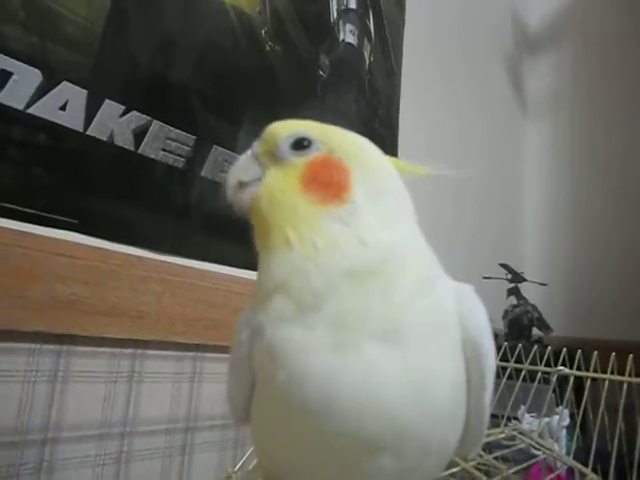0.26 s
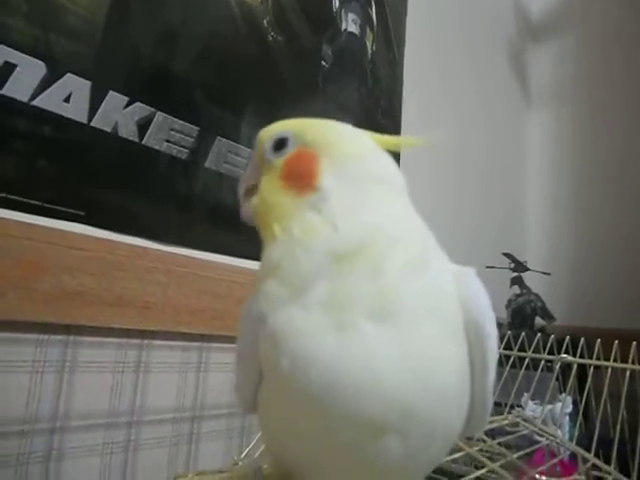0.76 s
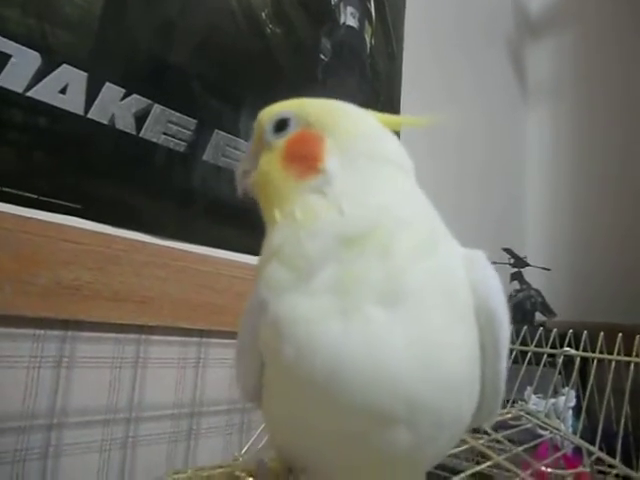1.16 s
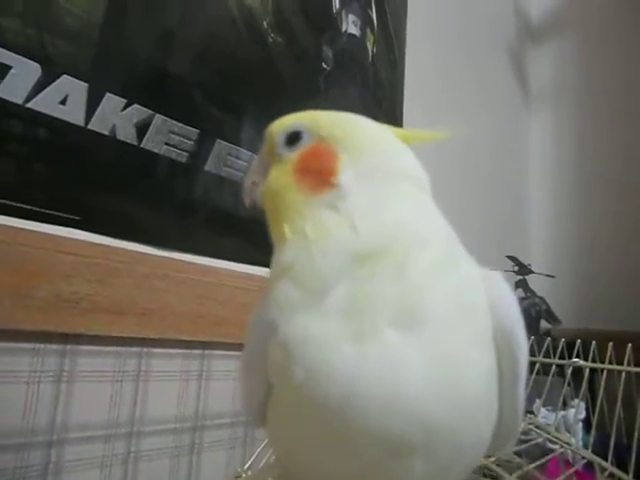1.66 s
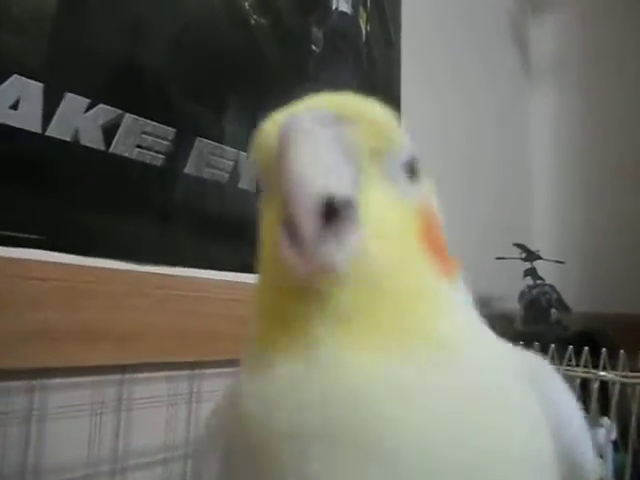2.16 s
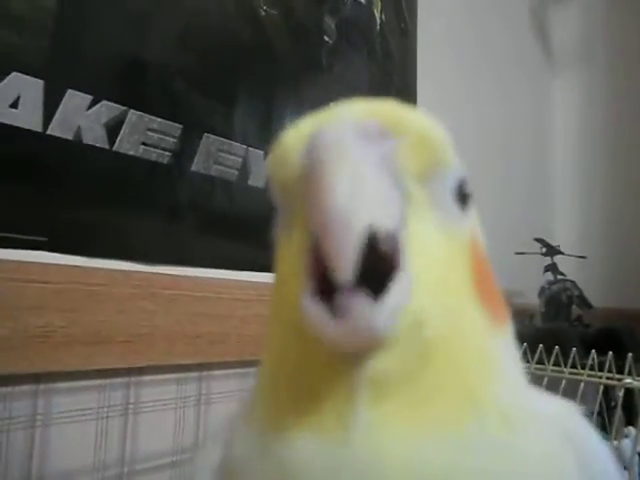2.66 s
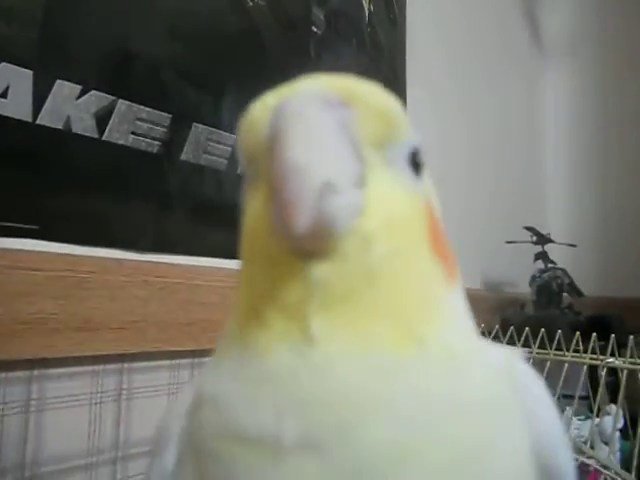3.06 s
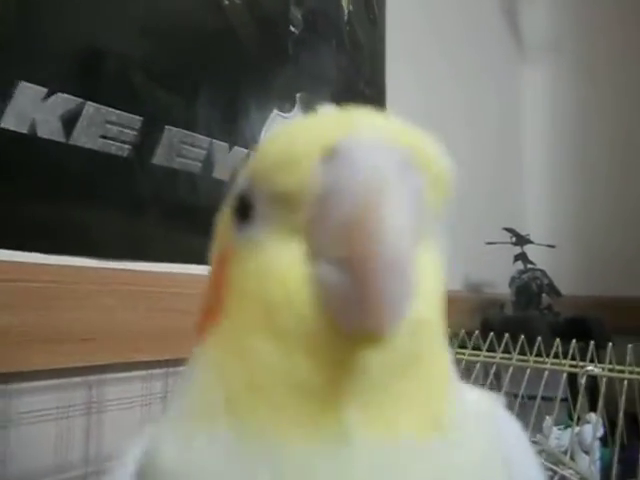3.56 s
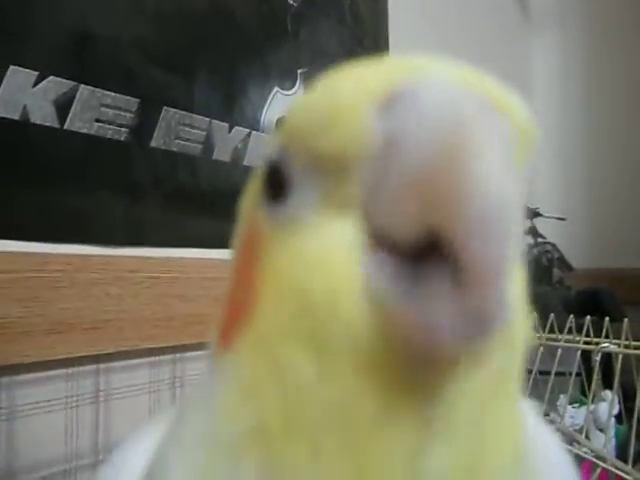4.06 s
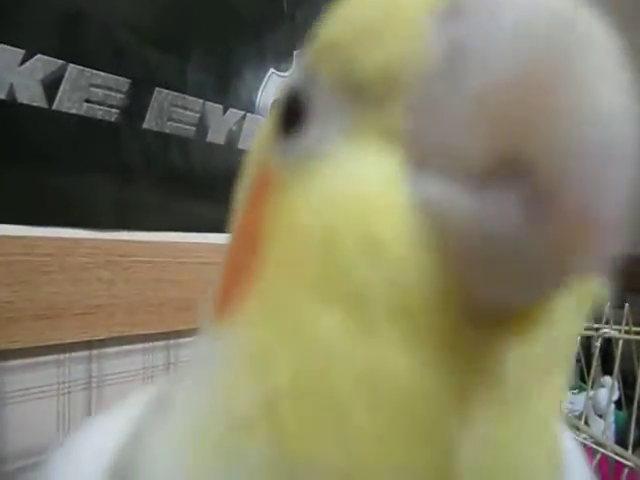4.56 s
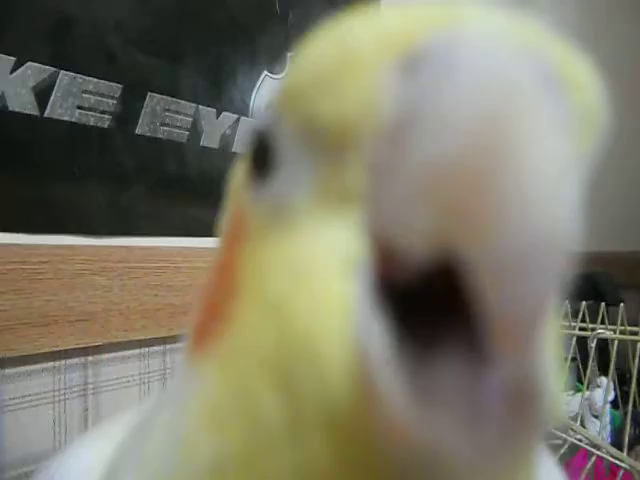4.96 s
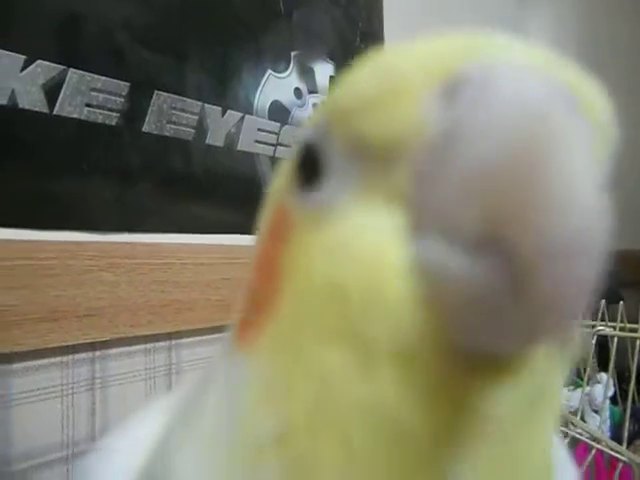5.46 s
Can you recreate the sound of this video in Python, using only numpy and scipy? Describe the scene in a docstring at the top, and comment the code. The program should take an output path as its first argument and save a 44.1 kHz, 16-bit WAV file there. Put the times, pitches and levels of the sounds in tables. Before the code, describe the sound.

A cockatiel croaks close to the microphone in a small room. From the start until about 2.7 seconds it gives twelve short calls, four or five a second. Each lasts just over a tenth of a second, dropping from a clear squeak into a rough rattle and often ending in a thin, falling whistle. The calls grow louder and drier as the bird comes closer, strongest around 2 seconds, with one soft, dull bump near 1.9. The bird then pauses, and a few small dry ticks sound, the clearest at about 3.8 seconds. From 4 seconds to about 5.6 comes a second bout of eight close croaks at the same pace, with a loud, bright squeak near 4.7 and a few faint ticks between calls. A faint electrical hum and hiss run underneath throughout, swelling and sinking slightly.

```python
"""A cockatiel croaks twenty short calls in two bouts, close by in a small room that hums.
Source and filter: the syrinx emits a pulse train that drops from a clear squeak into a rattle and
often ends in a thin whistle. The pulses excite the fixed resonances of the windpipe and a beak
resonance that sweeps up and down as the beak opens and shuts. A few dry ticks, one soft bump and
brief reflections join the calls, over mains hum and hiss."""
import sys
import numpy as np
from scipy import signal
from scipy.io import wavfile
from scipy.ndimage import minimum_filter1d

SR = 44100
rng = np.random.default_rng(int(sys.argv[2]) if len(sys.argv) > 2 else 0)


def output_pcm(signal):
    """Save a mono or channel-first signal as 16-bit PCM at the path in sys.argv[1].

    Samples are clipped to [-1, 1] before scaling.
    """
    pcm = np.clip(np.atleast_2d(signal).T, -1, 1) * 32767
    wavfile.write(sys.argv[1], SR, np.round(pcm).astype(np.int16))


N = 252252


def croak(length_s, opening_s, shutting_s, attack_s, level_db, accent_db, accent_s, pipe_db,
          squeak_hz, squeak_s, rattle_hz, roughness):
    """Formant sweep: the gape tunes the beak resonance while a clear squeak drops into a rattle."""
    t = np.arange(0, length_s, 1 / SR)
    left_s = np.maximum(length_s - t, 0)
    # the beak opens quickly, eases through the last of its gape, then shuts
    easing = 1 - .24 * np.exp(-t / (2.02 * opening_s))
    opened = (1 - np.exp(-(t / opening_s) ** 2)) * easing
    shut = 1 / (1 + (left_s / shutting_s) ** 2.385)
    gape = opened * (1 - shut)
    shut_hz, open_hz, shut_db = 1160, 4101, -25
    beak_hz = shut_hz + (open_hz - shut_hz) * gape
    # the squeak sags, then drops into a rougher rattle that sags more slowly
    squeak_sag_hz_per_s, drop_s, rattle_sag_hz_per_s = 9000, .011, 500
    squeak = np.exp(-np.maximum(t - squeak_s, 0) / drop_s)
    pitch_hz = squeak * (squeak_hz - squeak_sag_hz_per_s * np.minimum(t, squeak_s))
    pitch_hz += (1 - squeak) * (rattle_hz - rattle_sag_hz_per_s * (t - length_s / 2))
    roughness = roughness * (1 - .67 * squeak) * (1 - shut) + .97 * shut
    # effort: a swell, an early accent and a last push as the beak starts to shut
    push_lead_s, push_width_s, release_s = .012, .0077, .013
    swell_db = -18.5 * np.maximum(1 - t / attack_s, 0)
    accent = 1 / (1 + (t / accent_s) ** 4)
    push_db = 3 * np.exp(-((left_s - shutting_s - push_lead_s) / push_width_s) ** 2)
    flutter_db = 1.88 * drift(t, per_s=170)
    beak_db = level_db + swell_db + accent_db * accent + push_db + shut_db * (1 - gape)
    # a hard onset leaks briefly through the windpipe, which is also heard more as the beak shuts
    leak_above_db, leak_s = -15, .031
    leak_db = 2.1 * max(level_db + accent_db - leak_above_db, 0) * np.exp(-t / leak_s)
    pipe_db = pipe_db + .29 * swell_db + leak_db + 6 * shut
    sound = vocal_tract(t, pitch_hz, roughness, beak_hz, beak_db + flutter_db, pipe_db + flutter_db)
    return sound * np.sqrt(np.minimum(left_s / release_s, 1))


def whistle(length_s, beak_db, pipe_db, first_hz, last_hz, beak_hz, roughness=.22):
    """Register change: the syrinx flips to a thin, fading note; pitch and resonance glide together."""
    t = np.arange(0, length_s, 1 / SR)
    glide = (last_hz / first_hz) ** (t / length_s)
    fade_db = -5.5 * t / length_s
    return vocal_tract(t, first_hz * glide, roughness, beak_hz * glide,
                       beak_db + fade_db, pipe_db + fade_db)


def syrinx(t, pitch_hz, roughness, wander=.14, jitter=.085, shimmer=.5, doubling=.3):
    """Pulse source: one pulse a cycle; roughness adds jitter, shimmer, period doubling and noise."""
    cycles = np.cumsum(pitch_hz * np.exp(wander * roughness * drift(t, per_s=260))) / SR
    at = np.flatnonzero(np.diff(np.floor(cycles)) > 0)
    timing, strength = rng.standard_normal((512, 2))[:len(at)].T
    delay_cycles = np.ceil(cycles[at]) - cycles[at] + jitter * roughness[at] * timing
    centre = at + delay_cycles * SR / pitch_hz[at]
    alternation = (-1) ** np.arange(len(at))
    size = np.exp(np.sqrt(roughness[at]) * shimmer * strength + roughness[at] * doubling * alternation)
    # a windowed sinc places each pulse between samples
    near = np.floor(centre).astype(int)[:, None] + np.arange(-8, 9)
    offset = near - centre[:, None]
    shape = np.sinc(offset) * np.cos(np.pi * offset / 18) ** 2
    pulses = np.zeros(len(t))
    np.add.at(pulses, np.clip(near, 0, len(t) - 1), size[:, None] * shape)
    noise = rng.standard_normal(SR // 4)[:len(t)]
    return unit_rms(pulses) + .2 * np.sqrt(roughness) * noise


def vocal_tract(t, pitch_hz, roughness, beak_hz, beak_db, pipe_db):
    """Source-filter model: syrinx pulses ring the fixed windpipe and two moving beak resonances."""
    # response of the windpipe: frequency_hz, gain_db
    windpipe = [(220, -42), (460, -11), (760, -9), (1400, 0), (1900, -3), (2800, -6), (4200, -11),
                (5400, -27), (8000, -38), (10000, -57), (12000, -75)]
    # muffling of the windpipe by a shut beak: frequency_hz, gain_db
    muffle = [(1600, 9), (2400, -9.5), (4000, -7), (7000, -33.5)]
    # radiation from the beak: frequency_hz, gain_db
    beak_outlet = [(200, -6.5), (700, 15), (1200, 17), (4400, 6), (5300, -1), (6500, 2), (8000, -35.5),
                   (9500, -32), (12000, -76)]
    # bright edge that escapes from a wide open beak: frequency_hz, gain_db
    edge_outlet = [(2500, -28), (5000, -22.5), (6000, -2), (8100, 13), (9300, -10.5), (10500, -17),
                   (12000, -27)]
    strain = np.interp(beak_db, [-20, -11], [.03, .24])  # pushed hard, even a squeak gets gritty
    pulses = syrinx(t, pitch_hz, np.clip(roughness, strain, 1))
    beak = coloured(resonance(pulses, beak_hz, width_hz=680), beak_outlet)
    opening = np.interp(beak_hz, [1500, 2800], [0, 1])
    pipe = coloured(pulses, windpipe)
    pipe = opening * pipe + (1 - opening) * coloured(pipe, muffle)
    # the weak upper resonance grows with strain and fades as the beak shuts
    edge = coloured(resonance(pulses, 1.83 * beak_hz, width_hz=1150), edge_outlet)
    edge_gain = gain_of(beak_db - 31 + 12 * strain) * (beak_hz / 4000) ** 4
    sound = gain_of(beak_db) * levelled(beak) + gain_of(pipe_db) * levelled(pipe)
    sound += edge_gain * levelled(edge)
    return sound * np.clip(t / .002, 0, 1) * np.clip((t[-1] - t) / .005, 0, 1)


def tick(peak_db, ring_hz, crack_s=.00037, ring_s=.001):
    """Impulsive transient: a tiny crack of noise with a heavily damped ring."""
    t = np.arange(SR // 50) / SR
    crack = rng.standard_normal(len(t)) * np.exp(-t / crack_s)
    ring = .15 * np.sin(2 * np.pi * ring_hz * t) * np.exp(-t / ring_s)
    sound = signal.sosfilt(signal.butter(14, 10000, fs=SR, output="sos"), crack + ring)
    return gain_of(peak_db) * sound / abs(sound).max()


def bump(pitch_hz=105, rise_s=.003, decay_s=.013):
    """Damped oscillation: a dull push rings for a few cycles."""
    t = np.arange(SR // 5) / SR
    envelope = (1 - np.exp(-t / rise_s)) * np.exp(-t / decay_s)
    return gain_of(-35) * envelope * np.sin(2 * np.pi * pitch_hz * t)


def room(x, t60_s=.27, first_s=.004, reflections_per_s=2500):
    """Reverberation: sparse reflections of random sign decay exponentially."""
    t = np.arange(SR // 2) / SR
    response = rng.standard_normal(len(t)) * gain_of(-60 * t / t60_s)
    response *= (rng.random(len(t)) < reflections_per_s / SR) & (t > first_s)
    return signal.fftconvolve(x, response / np.linalg.norm(response))[:N]


def background(mains_hz=60):
    """Line spectrum over broadband noise: mains harmonics and room hiss swell and sink together."""
    # partials of the hum: harmonic_number, relative_level_db
    harmonics = [(1, -8.5), (2, -10.5), (3, 0.5), (4, -14.5), (5, -18.5), (6, -13), (7, -18), (9, -13.5),
                 (10, -12.5), (11, -11.5), (13, -8), (14, -18), (15, -8)]
    # spectrum of the hiss: frequency_hz, relative_density_db
    hiss_spectrum = [(18, -6), (50, -1.5), (150, 0), (300, -4.5), (500, -2), (850, 1.5), (1300, -1.5),
                     (2200, -8), (4000, -11), (7000, -11.5), (10400, -14), (11200, -34), (12000, -29.5),
                     (12700, -77.5)]
    # envelope of both: time_s, level_db
    swell = [(0.0, -51.5), (0.27, -52), (0.43, -48), (0.92, -43), (1.21, -44), (1.31, -46), (2.37, -48),
             (2.44, -52.5), (2.69, -57), (3.28, -58.5), (3.43, -51.5), (3.94, -44), (4.03, -55.5),
             (5.29, -57.5), (5.56, -54.5)]
    t = np.arange(N) / SR
    hum = np.zeros(N)
    for number, level_db in harmonics:
        amplitude = gain_of(level_db) * np.sqrt(2) * (1 + .06 * drift(t, per_s=.93))
        hum += amplitude * np.sin(2 * np.pi * (number * mains_hz * t + rng.random()))
    hiss = unit_rms(coloured(rng.standard_normal(N), hiss_spectrum))
    return gain_of(np.interp(t, *np.transpose(swell))) * (hum + hiss)


def resonance(x, centre_hz, width_hz):
    """Two identical resonators in cascade, each width_hz wide, follow a moving centre frequency."""
    carrier = np.exp(2j * np.pi * np.cumsum(centre_hz) / SR)
    pole = np.exp(-np.pi * width_hz / SR)
    for _ in range(2):
        x = 2 * (carrier * signal.lfilter([1 - pole], [1, -pole], x / carrier + 1e-18)).real
    return x


def coloured(x, spectrum):
    """Minimum-phase filter through points of frequency_hz, gain_db."""
    hz, db = np.transpose(spectrum)
    bin_hz = abs(np.fft.fftfreq(4096, 1 / SR))
    log_gain = np.log(gain_of(np.interp(np.log(bin_hz + 1), np.log(hz), db)))
    taps = np.fft.ifft(np.exp(np.conj(signal.hilbert(log_gain)))).real
    return signal.fftconvolve(x, taps)[:len(x)]


def levelled(x, span_s=.012):
    """Short-time normalisation: holds the rms at 1 while single pulses keep their shape."""
    window = signal.windows.hann(int(span_s * SR))
    power = abs(signal.fftconvolve(x ** 2, window / window.sum(), "same"))
    return x / np.sqrt(power + 1e-14)


def unit_rms(x):
    """Normalisation to a mean power of 1."""
    return x / np.sqrt(np.mean(x ** 2) + 1e-20)


def drift(t, per_s):
    """Random modulation: Gaussian values joined by straight lines."""
    return np.interp((t - t[0]) * per_s, np.arange(256), rng.standard_normal(256))


def gain_of(db):
    """Amplitude ratio of a level in decibels."""
    return 10 ** (np.asarray(db) / 20)


def add(mix, start_s, sound):
    """Superposition: sums a sound into the mix from start_s on."""
    part = mix[round(start_s * SR):][:len(sound)]
    part += sound[:len(part)]


def scene(far_room_db=-21, near_room_db=-29, bump_s=1.897):
    """Direct and reverberant sound: the bird steps closer in the first bout, so the room answers less."""
    # calls: start_s, length_s, opening_s, shutting_s, attack_s, level_db, accent_db, accent_s,
    # pipe_db, squeak_hz, squeak_s, rattle_hz, roughness (0 to 1)
    croaks = [ (0.021, 0.1085, 0.0093, 0.021, 0.026, -26.5, 3, .062, -39, 1447, 0.0015, 753, 0.64),
              (0.233, 0.13, 0.018, 0.02, 0.0089, -30, 6.5, .055, -38.5, 1449, 0.0034, 789, 0.61),
              (0.457, 0.12, 0.011, 0.021, 0.0091, -23.5, -3.5, 0.032, -37.5, 1050, 0.0058, 764, 0.57),
              (0.659, .130, 0.012, 0.021, 0.021, -23, -0.5, 0.045, -34.5, 1340, 0.0021, 774.6, 0.7),
              (0.918, 0.1016, 0.0018, 0.017, 0.027, -28, 16.5, 0.054, -35, 900, 0.0019, 798.6, 0.79),
              (1.213, .130, 0.0023, 0.016, 0.032, -27.5, 17, 0.063, -34.5, 914, 0.00083, 774, 0.74),
              (1.444, 0.13, 0.0037, 0.019, 0.017, -23, 12, .024, -36.5, 912, 0.00097, 792, 0.78),
              (1.643, 0.15, 0.014, 0.02, 0.01, -19.5, -0.5, .040, -34, 1309, 0.0056, 773.6, 0.81),
              (1.865, .150, 0.012, .016, 0.024, -15, 2, 0.095, -31.5, 1334, 0.0041, 760, 0.73),
              (2.121, 0.13, 0.0069, 0.02, 0.022, -14, 2, 0.018, -33, 1273, 0.00088, 709.4, 0.8),
              (2.372, 0.1312, 0.0022, .022, 0.0038, -20.5, 11.5, 0.04, -35.5, 1447, .022, 765, 0.7),
              (2.607, 0.12, 0.0027, 0.02, .006, -22.5, 11.5, 0.046, -42, 1576, 0.022, 723, 0.1),
              (3.959, 0.12, 0.0012, .020, 0.0028, -17.5, 11.5, 0.022, -37.5, 1498, 0.0036, 795, .33),
              (4.177, 0.116, 0.0018, 0.021, 0.0025, -19, 7.5, 0.029, -38, 1610, .007, 721, .36),
              (4.421, 0.12, 0.0033, 0.022, 0.022, -21.5, 9, 0.015, -37.5, 1430, 0.0049, 764, 0.64),
              (4.687, 0.1, 0.0011, 0.021, .001, -19.5, 6.5, 0.023, -39, 1402, 0.0079, 794, 0.2),
              (4.858, 0.13, 0.017, .018, 0.026, -24.5, 6.5, 0.052, -37, 1411, .006, 714, 1),
              (5.07, 0.13, 0.013, 0.02, 0.019, -24, 6.5, 0.03, -39.5, 1380, 0.0014, 714, 0.81),
              (5.278, 0.14, 0.019, 0.014, 0.028, -21, -5, 0.014, -36.5, 1380, .009, 709, .8),
              (5.499, 0.14, 0.025, 0.018, 0.039, -21.5, 9.5, 0.046, -36, 1458, 0.0026, 679, 0.49), ]
    # notes in the clear register: start_s, length_s, beak_db, pipe_db, first_hz, last_hz, beak_hz
    whistles = [ (0.118, 0.041, -54, -34.5, 1870, 1080, 1700), (0.36, 0.03, -36, -37, 1550, 1115, 1590),
                (0.548, 0.01, -24, -36, 1250, 1100, 2300), (0.563, 0.017, -39, -31.5, 1780, 1570, 1560),
                (0.795, 0.033, -40.5, -40, 1247, 1130, 1250), (1.004, 0.019, -25, -33, 1083, 1110, 1620),
                (1.54, 0.02, -25, -29, 1258, 1160, 2450), (1.759, 0.027, -31, -28, 1090, 1160, 2100),
                (1.792, 0.045, -35.5, -33.5, 1237, 1110, 1250), (1.987, 0.022, -34, -23, 1145, 1178, 2380),
                (2.011, 0.01, -32.5, -30.5, 1360, 1100, 1400), (2.227, 0.012, -28.5, -23, 956, 947, 1920),
                (2.498, 0.0082, -32, -40, 1330, 1170, 1310), (2.723, 0.01, -38, -42.5, 1454, 1300, 1300),
                (4.058, 0.015, -41, -36, 1404, 1280, 1250), (4.284, .015, -37.5, -30, 1356, 1200, 1310),
                (4.531, 0.0095, -38, -30.5, 1430, 1230, 1386), (4.671, 0.019, -21.5, -43, 3230, 3145, 3160),
                (4.678, 0.024, -10.5, -42, 1992, 2280, 3580), (4.762, 0.019, -35, -34, 1106, 1110, 1200),
                (4.779, 0.018, -32.5, -42, 1580, 1050, 1500), (4.98, 0.031, -39, -35, 1630, 1110, 1640),
                (5.179, 0.036, -32.5, -55, 1460, 1078, 1500), (5.402, 0.029, -36, -33.5, 1560, 1133, 1570),
                (5.630, 0.025, -34, -39, 1685, 1150, 1660), ]
    # small dry ticks: start_s, peak_db, ring_hz
    ticks = [(2.341, -32, 6040), (2.598, -37, 3870), (3.544, -30, 3100), (3.8265, -18, 2400),
             (3.941, -26, 4040), (4.399, -35.5, 1860), (4.415, -36, 3980), (4.634, -39, 1550)]
    direct = np.zeros(N)
    for source, events in (croak, croaks), (whistle, whistles), (tick, ticks):
        for start_s, *settings in events:
            add(direct, start_s, source(*settings))
    add(direct, bump_s, bump())
    room_gain = gain_of(np.interp(np.arange(N) / SR, [1.7, 2.5], [far_room_db, near_room_db]))
    return (direct + room_gain * room(direct) + background())[None]


def record(dry, ceiling=.78, cutoff_hz=15961):
    """Limiting: gain falls in loud stretches, overshoots clip softly, and a low-pass bounds the band."""
    held_peak = -minimum_filter1d(-abs(dry), 91)
    envelope = signal.lfilter(np.ones(110) / 110, [1], held_peak)
    limited = dry / (1 + (envelope / ceiling) ** 5) ** (1 / 5)
    clipped = limited / (1 + (limited / ceiling) ** 24) ** (1 / 24)
    low_pass = signal.firwin(511, cutoff_hz, window=("kaiser", 9), fs=SR)
    return signal.oaconvolve(clipped, low_pass[None], "same")


dry = scene()
out = record(dry)
output_pcm(out)
```